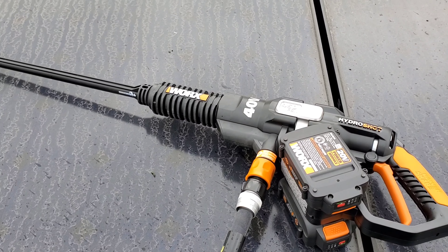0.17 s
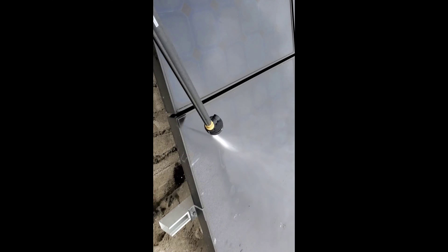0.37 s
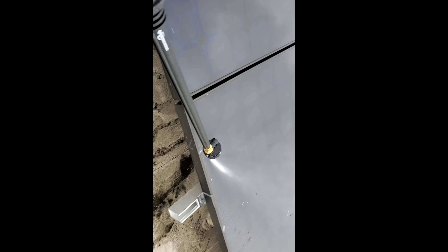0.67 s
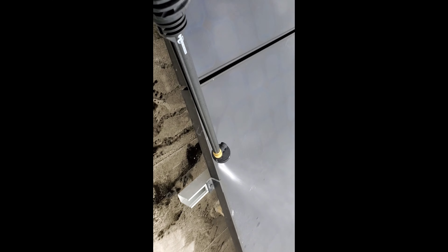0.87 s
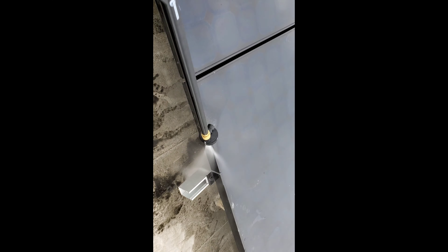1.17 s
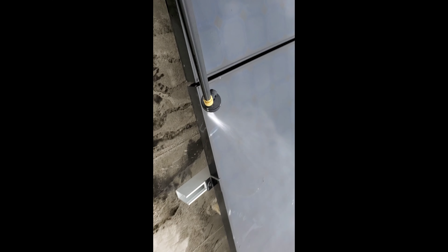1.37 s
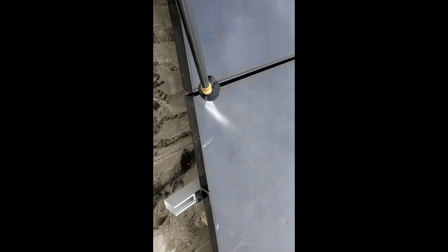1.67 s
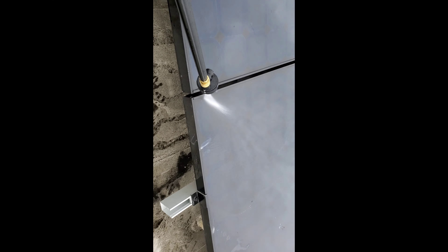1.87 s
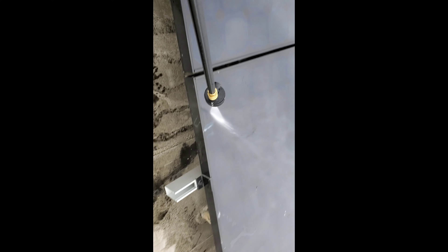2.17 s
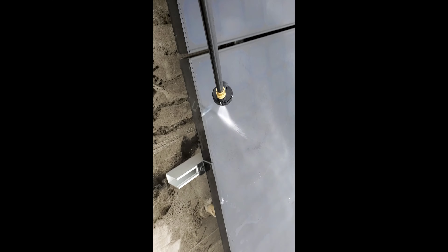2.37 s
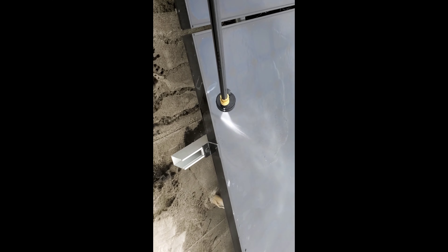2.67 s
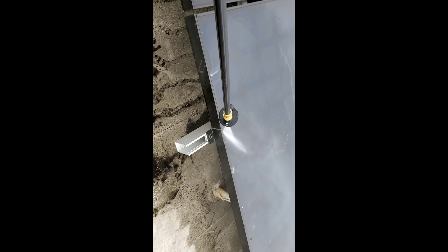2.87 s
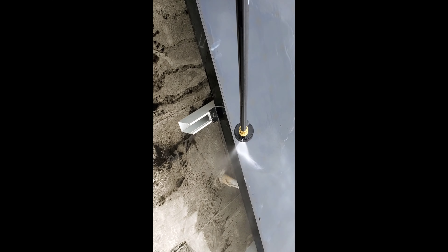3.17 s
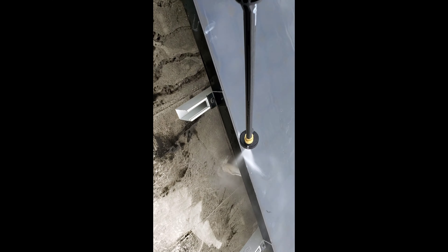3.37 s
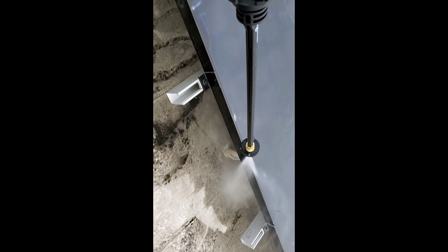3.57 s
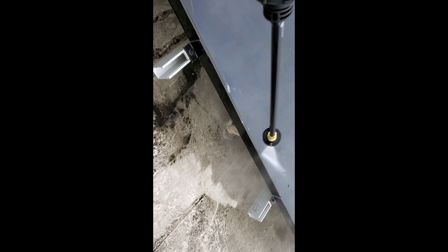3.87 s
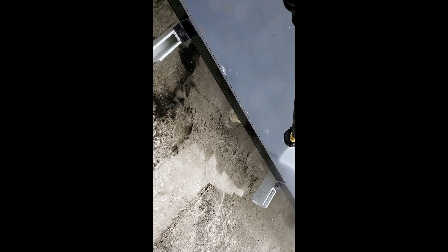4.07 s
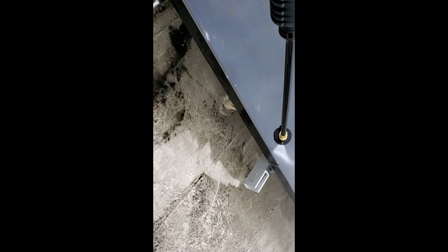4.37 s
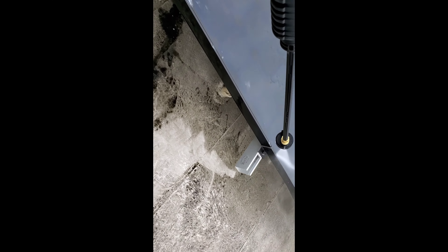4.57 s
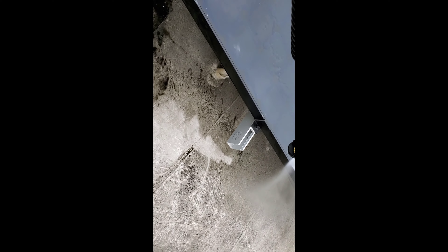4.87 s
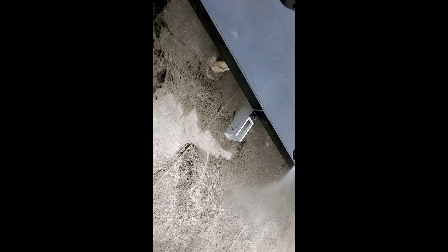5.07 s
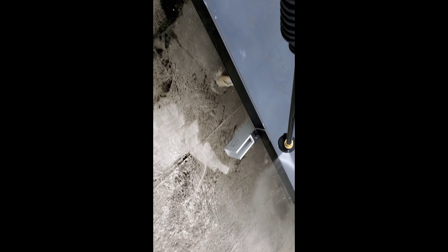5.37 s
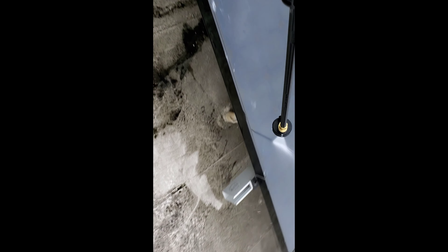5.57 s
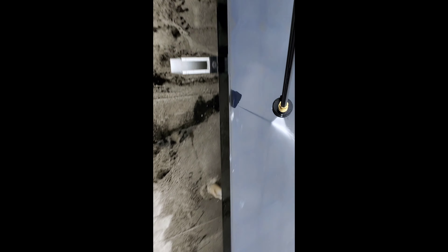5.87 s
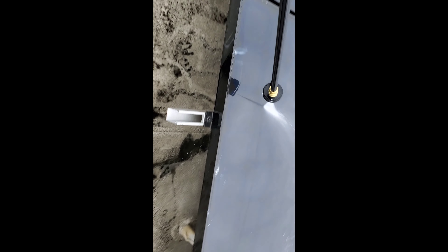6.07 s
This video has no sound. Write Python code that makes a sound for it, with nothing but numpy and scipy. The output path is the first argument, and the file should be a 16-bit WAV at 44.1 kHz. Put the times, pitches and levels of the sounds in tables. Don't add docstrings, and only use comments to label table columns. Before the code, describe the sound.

Quiet yard ambience for under half a second, a tiny gap, then a sudden loud washer very near a phone. Water hisses sharply in a very fast throb and spatters off a glass panel; the pump rattles, the casing buzzes and the motor whines steadily. Irregular low wind thuds hit the microphone, mostly on the left, and two strong blasts briefly push the washer's level down. It is still spraying at the end.

```python
import sys
import numpy as np
from scipy import signal
from scipy.fft import rfft, irfft, next_fast_len
from scipy.io import wavfile
from scipy.ndimage import uniform_filter1d, map_coordinates

SR = 44100
rng = np.random.default_rng(int(sys.argv[2]) if len(sys.argv) > 2 else 0)


def invert_db(level):
    return 10 ** (np.asarray(level, dtype=float) / 20)


def digitize_waveform(pressure):
    field = np.atleast_2d(pressure).T
    bounded = np.clip(field, -1, 1)
    quanta = np.round(bounded * 32767).astype(np.int16)
    wavfile.write(sys.argv[1], SR, quanta)


N = 274743
T = np.arange(N) / SR
BIN_HZ = np.fft.rfftfreq(512, 1 / SR)
PUMP_HZ, WHINE_HZ = 38.868, 3604.3
# t/s, left level/dB, right minus left/dB, lag of the right port/ms
WHINE_PATH = [(.45, -25, 8.5, .46), (.96, -26, 7, .48), (1.0, -35, 5, .49), (1.1, -37, 4, .5),
              (1.25, -35, -2, .515), (1.45, -43, 6, .52), (1.6, -40, 3, .455), (1.75, -38, 2, .44),
              (2.0, -39, 1, .425), (2.15, -42, 3, .455), (2.35, -43, 2, .452), (2.9, -45, 3, .47),
              (3.05, -38, -6, .455), (3.25, -40, 0, .415), (3.4, -36, 0, .415), (3.6, -38, 0, .415),
              (3.8, -36, 0, .415), (3.95, -36, 3, .44), (4.1, -39, 3, .45), (4.4, -39, 4, .48),
              (4.55, -34, 0, .55), (4.75, -36.5, 0, .555), (5.0, -32.5, 0, .555), (5.3, -35, 0, .555),
              (5.45, -35.5, 2, .54), (5.65, -45, 7, .4), (5.78, -43, 9, .34), (5.9, -36, -20, .435),
              (6.07, -38, -20, .52), (6.2, -41, 0, .5)]


def level(x, db):
    return x * invert_db(db) / np.sqrt(np.mean(x ** 2))


def shape(points, hz):
    at, value = np.transpose(points)
    return np.interp(np.log(np.maximum(hz, 1)), np.log(at), value)


def colour(x, points):
    size = next_fast_len(N)
    gain = invert_db(shape(points, np.fft.rfftfreq(size, 1 / SR)))
    return irfft(rfft(x, size) * gain, size)[..., :N]


def to_spectrum(x):
    return signal.stft(x, SR, nperseg=512)[2]


def to_sound(z):
    return signal.istft(z, SR, nperseg=512)[1][..., :N]


def patches(count, patch_hz, patch_s):
    field = rng.standard_normal((len(BIN_HZ), count))
    field = uniform_filter1d(field, 1 + int(patch_hz / BIN_HZ[1]), axis=0)
    field = uniform_filter1d(field, 1 + int(patch_s * SR / 256), axis=1)
    return field / field.std()


def hiss(points, patchy_db, patch_hz, patch_s):
    z = to_spectrum(colour(rng.standard_normal((2, N)), points))
    wander_db = patchy_db * patches(z.shape[2], patch_hz, patch_s)
    return level(to_sound(z * invert_db(wander_db)), 0)


def waver(depth_db):
    knots = np.linspace(0, N / SR, 40)
    return np.interp(T, knots, invert_db(depth_db * rng.standard_normal(len(knots))))


def tones(hz, db, waver_db):
    out = 0
    for f, d in zip(hz, db):
        wave = np.sin(2 * np.pi * (f * T + rng.random()))
        out = out + invert_db(d) * waver(waver_db) * np.sqrt(2) * wave
    return out


def gun():
    # t/s, jet level/dB, casing minus jet/dB, how far the jet's top leans left/dB
    gun_moves = [(.44, -20.5, -5.5, 2), (.6, -20.5, -7.5, 3), (.89, -23.5, -5, 2.5), (.95, -22.5, -11.5, 4),
                 (1.1, -22, -10, 5), (1.299, -23, -10, 3), (1.7, -24.5, -10.5, 3), (1.89, -23, -12, 6),
                 (2.25, -24, -10, 3), (3.2, -23.5, -12.5, 6), (3.8, -20.5, -12.5, 10),
                 (4.0, -21.5, -8, 10.5), (4.551, -21.5, -7.5, 12), (5.1, -19.5, -8, 17),
                 (5.3, -20.5, -6.5, 15), (5.6, -21.5, -7, 11.5), (5.799, -20, -13.5, 9),
                 (5.95, -21.5, -11.5, 10.5), (6.23, -21.5, -11.5, 6)]
    # f/Hz, level per Hz/dB
    jet_spectrum = [(9000, -31.5), (10500, -12), (11500, -6.5), (12300, 1), (13300, 0.5), (14000, -0.5),
                    (15600, -2)]
    splash_spectrum = [(3000, -12.5), (5000, -9.5), (5900, -8), (6600, -1.5), (7500, -2), (8250, -1.5),
                       (8700, -1.5), (9200, -4), (9750, -8), (10400, -6), (12000, -16.5)]
    casing_spectrum = [(200, -20.5), (400, -7.5), (850, -3.5), (1300, 0.5), (1600, -2), (2200, 4),
                       (2500, -0.5), (3100, 1), (3420, -0.5), (3750, -7.5), (3950, -5.5), (4400, -1),
                       (4800, -4.5), (5500, -2.5), (7000, -45.5)]
    # f/Hz, level/dB
    turned_away = [(2300, -40), (2600, 0), (3450, 0), (3900, -40)]
    sung_orders = [27, 30, 34, 42, 46, 48, 52, 54, 55, 56, 57, 58, 70, 72, 73, 74, 113, 114, 116, 174, 229,
                   230, 282, 284, 286, 340, 342]
    sung_db = [-17, -20, -19, -16, -18, -18, -15, -12, -15, -11, -15, -5.5, -20, -19, -19, -20, -13, -14,
               -17, -17, -8, -14, -14, -13, -13, -8, -6]
    # multiple of the pump turn, level over the jet/dB
    hum_lines = [(9, -27), (10, -29), (14, -28), (16, -27), (17, -20), (19, -19.5), (20, -27)]
    # ratio to the whine, level over the jet/dB
    motor_lines = [(1.2958, -25), (1.4, -22)]

    s, *columns = np.transpose(gun_moves)
    jet_db, casing_db, lean_db = (np.interp(T, s, c) for c in columns)

    jet = hiss(jet_spectrum, patchy_db=2.5, patch_hz=597, patch_s=.25)
    jet = invert_db(10.5) * jet * throb(2.26, 0.144, 0.47)

    splash_db = -2 - 0.3235 * lean_db
    splash = hiss(splash_spectrum, patchy_db=-0.6, patch_hz=400, patch_s=0.29)
    splash = invert_db(splash_db + 4.5) * splash * throb(0.41, 0.315, 0.156)

    casing = hiss(casing_spectrum, patchy_db=2.18, patch_hz=300, patch_s=0.14)
    casing = invert_db(casing_db + 3.0) * casing * throb(0.8, 0.738, 1.11)
    fade = invert_db(-.8 * np.maximum(lean_db - 7.5, 0))
    casing = casing + (fade - 1) * colour(casing, turned_away)

    gears = invert_db(casing_db) * tones(PUMP_HZ * np.array(sung_orders), sung_db, waver_db=2)
    order, hum_db = np.transpose(hum_lines)
    hum = tones(PUMP_HZ * order, hum_db, waver_db=1.5)
    ratio, motor_db = np.transpose(motor_lines)
    motor = tones(ratio * WHINE_HZ, motor_db, waver_db=3)
    tonal = gears + hum + motor + invert_db(-18.5) * knocks(waver_db=4.0)
    return invert_db(jet_db) * (jet + splash + casing), invert_db(jet_db) * tonal, lean_db


def throb(depth_db, peak, double_db):
    turn = 2 * np.pi * (PUMP_HZ * T - peak)
    return invert_db(depth_db * np.cos(turn) + double_db * np.cos(2 * turn))


def knocks(waver_db):
    knock_places = [(0.15, 5.5), (.45, 8.5), (.55, -4), (0.805, -17.5)]
    # f/Hz, width/Hz (wider dies sooner), level/dB
    casing_rings = [(1170, 380, -6), (1657, 127, -4), (2200, 340, -19.5), (4330, 395, -2.5),
                    (6980, 272, -1), (8075, 150, 4), (8800, 200, 0), (11090, 250, 4), (13300, 300, 10),
                    (12050, 2500, -7.5)]
    turn = np.linspace(0, 1, 16384)
    part, size_db = np.transpose(knock_places)
    since = (turn - part[:, None]) % 1 / PUMP_HZ
    out = 0
    for hz, width, db in casing_rings:
        ring = np.exp(-np.pi * width * since) * np.sin(2 * np.pi * hz * since)
        one_turn = level(invert_db(size_db) @ ring, db)
        out = out + waver(waver_db) * np.interp(PUMP_HZ * T % 1, turn, one_turn)
    return out


def whine():
    s, left_db, tilt_db, lag_ms = np.transpose(WHINE_PATH)
    heard_at = np.array([T, T - np.interp(T, s, lag_ms) / 1000])
    db = np.array([np.interp(T, s, left_db), np.interp(T, s, left_db + tilt_db)])
    main = invert_db(db + 2.5) * waver(.6) * np.sin(2 * np.pi * WHINE_HZ * heard_at)

    heard_at = np.array([T, T - .535 / 1000])
    octave = np.array([waver(3), waver(3)]) * np.sin(4 * np.pi * WHINE_HZ * heard_at)
    return np.sqrt(2) * (main + invert_db(-41.5) * octave)


def ports(noise, tonal, lean_db):
    # t/s, edge of the wind guard f/Hz, lag of the right port/ms, phase lead from the panel's echo/rad
    guard_moves = [(.43, 980, 0.442, 1.3), (.8, 1150, 0.462, 1.45), (.95, 2540, 0.478, 1.21),
                   (1.1, 4200, 0.483, 1.39), (1.601, 5260, 0.442, 0.58), (1.85, 4366, 0.45, 1.34),
                   (2.699, 4200, 0.4666, 0.95), (2.9, 5150, 0.503, 1.3), (3.1, 3520, 0.517, 1.04),
                   (3.5, 4602, 0.527, 0.61), (3.8, 4616, 0.5305, 0.57), (4.05, 3880, 0.5335, 0.61),
                   (4.3, 4950, 0.539, 0.65), (4.552, 3940, 0.538, 0.35), (5.0, 4634, 0.4986, -0.3),
                   (5.4, 4487, 0.5055, -0.56), (5.55, 4050, 0.514, -0.2), (5.68, 3300, 0.539, 0.55),
                   (5.8, 2380, 0.544, 0.21), (5.92, 2050, 0.531, 0.84), (6.02, 1160, 0.514, -0.98),
                   (6.23, 1093, 0.558, -1)]
    # f/Hz, share heard alike by both ports (0 to 1)
    shared_part = [(300, 1), (1400, 1), (2500, 0.4), (5000, 0.3), (5600, 0.4), (6600, 0.2), (8500, 0.3),
                   (9400, .85), (10200, .85), (11200, .25), (15000, 0.14)]
    # f/Hz, level/dB
    right_colour = [(900, 6.5), (1300, 3), (1650, 10), (2100, 6), (3000, 4.5), (4400, 10.5), (5000, 6.5),
                    (6000, -3), (8000, -2), (10000, 1.5), (11500, -5), (13300, -15.5), (14300, -16.5),
                    (15500, -17)]
    # f/Hz, level/dB
    guard_leak = [(1500, -14), (2200, -4), (2600, -3), (2900, -6), (3150, -1.5), (3600, -4), (4200, -4)]
    # t/s, lag/ms
    dip_path = [(.45, .466), (.9, .466), (1.0, .415), (1.45, .415), (1.6, .478), (2.5, .478), (2.62, .415),
                (3.3, .415), (3.45, .445), (3.8, .461), (5.65, .461), (5.8, .43), (6.2, .44)]
    # t/s, lag/ms
    splash_path = [(.45, .55), (1.0, .53), (1.5, .54), (1.9, .5), (2.3, .51), (2.65, .56), (6.2, .565)]

    s, edge_hz, lag_ms, lead = np.transpose(guard_moves)
    late = np.arange(N) - np.interp(T, s, lag_ms) * SR / 1000
    hiss_late = to_spectrum(map_coordinates(noise[0], [late], order=3))
    tonal_late = to_spectrum(map_coordinates(tonal, [late], order=3))
    other_hiss = to_spectrum(noise[1])
    at = np.arange(hiss_late.shape[1]) * 256 / SR
    hz = BIN_HZ[:, None]

    share = np.clip(shape(shared_part, hz), 0, 1)
    own = np.sqrt(share) * hiss_late + np.sqrt(1 - share) * other_hiss + tonal_late
    shade = [(4500, 0), (5400, 0.627), (6300, 1.59), (6700, 0.76), (9000, 0.0), (13000, 0.665)]
    shade_db = (np.interp(at, T, lean_db) - 7.5) * shape(shade, hz)
    own = own * invert_db(shape(right_colour, hz) - shade_db)

    leak = invert_db(shape(guard_leak, hz))
    copy = (hiss_late + leak * other_hiss) / np.sqrt(1 + leak ** 2) + tonal_late
    above = np.clip((hz - np.interp(at, s, edge_hz)) / 150 + .5, 0, 1)

    turn = shape([(200, 0.0), (550, 0.73), (1300, 0.321), (2000, 0.167)], hz)
    turn = turn + np.interp(at, s, lead) * np.exp(-((hz - 1500) / 350) ** 2)
    whine_path = np.transpose(WHINE_PATH)[[0, 3]]
    for path, centre_hz, width_hz, power in [(whine_path, 3650, 190, 2),
                                             (np.transpose(dip_path), 9800, 900, 4),
                                             (np.transpose(splash_path), 5900, 1800, 4)]:
        sooner_ms = np.interp(at, s, lag_ms) - np.interp(at, *path)
        band = np.exp(-((hz - centre_hz) / width_hz) ** power)
        turn = turn + 2 * np.pi * hz * sooner_ms / 1000 * band
    wander = [(1000, .1), (3500, .25), (6000, .5), (7000, .9), (8600, 2), (9300, .45), (10300, .45), (11200, 2)]
    turn = turn + shape(wander, hz) * patches(len(at), patch_hz=350, patch_s=.25)
    right = (above * own + (1 - above) * copy) * np.exp(1j * turn)
    return np.array([noise[0] + tonal, to_sound(right)])


def wind():
    # t/s, peak level/dB, time to fall 10 dB/s, left minus right/dB
    gust_times = [(.68, -35, 0.31, 9), (.88, -33, 0.06, 4), (0.969, -29.5, 0.2, 1.5),
                  (1.24, -23.5, 0.06, -0.5), (1.41, -23.5, 0.07, 2.5), (1.53, -24, 0.16, 0),
                  (1.73, -22.5, 0.074, 3.5), (2.06, -24.5, 0.0743, -1), (2.18, -30.5, 0.13, 4),
                  (2.32, -28, 0.0041, 11.5), (2.69, -40, 0.58, 5.5), (2.87, -37.5, 0.4, 1.5),
                  (3.15, -30.5, 1.15, 1.5), (3.43, -31, 0.39, 1), (3.781, -30, 0.12, -0.5),
                  (4.1, -26, 0.28, 1.5), (4.35, -27, 0.32, 3.5), (4.607, -22, 0.06, 5.5),
                  (4.83, -26.5, 0.15, 4), (5.03, -30, 0.04, 5.5), (5.22, -28.5, 0.03, 9.5),
                  (5.31, -27.5, 0.0477, 7), (5.45, -28.5, 0.06, 10.5), (5.65, -35, 0.5, 5),
                  (6.15, -29, 0.16, 1.5)]
    # f/Hz, level per Hz/dB
    gust_spectrum = [(20, -12.5), (40, 1), (80, 1.5), (200, -6), (450, -11), (900, -19.5), (2000, -25)]
    s, db, fall_s, pan_db = np.transpose(gust_times)
    swell = invert_db(-20 * abs(T - s[:, None]) / fall_s[:, None])
    breeze = invert_db(2 * -38.5)
    power = np.array([invert_db(2 * db + side * pan_db) @ swell + breeze for side in (1, -1)])
    gust_db = 10 * np.log10(power)
    low = hiss(gust_spectrum, patchy_db=3, patch_hz=150, patch_s=.04)
    rush = level(colour(low, [(150, -33.5), (400, 4.5), (900, -3.5)]), 0)
    return invert_db(gust_db + 2) * low + invert_db(3.65 * (gust_db + 28.0) - 57.0) * rush


def pops():
    # t/s, peak level/dB, port (0 left, 1 right), push +1 or pull -1
    slaps = [(0.571, -17.7, 0, 1), (0.879, -17.1, 0, 1), (1.251, -16.4, 0, 1), (1.251, -15.2, 1, -1),
             (1.39, -13.7, 0, 1), (1.394, -16.4, 0, 1), (1.406, -17.6, 0, -1), (1.406, -12.6, 1, -1),
             (1.412, -13.9, 1, 1), (1.43, -15.2, 0, 1), (1.443, -17.4, 0, -1), (1.499, -16.0, 0, 1),
             (1.512, -17.2, 0, -1), (1.516, -17.1, 1, 1), (1.519, -16.0, 0, 1), (1.52, -17.1, 1, -1),
             (1.524, -17.3, 1, -1), (1.534, -15.7, 1, -1), (1.683, -17.2, 0, -1), (1.72, -14.9, 0, 1),
             (2.036, -17.4, 0, -1), (2.045, -17.5, 1, -1), (2.307, -11.1, 0, 1), (2.638, -17.8, 0, -1),
             (2.713, -16.7, 0, 1), (4.096, -17.6, 0, -1), (4.135, -16.9, 0, 1), (4.154, -17.5, 1, 1),
             (4.364, -15.9, 0, 1), (4.516, -14.5, 0, 1), (4.521, -14.9, 0, 1), (4.563, -15.8, 0, 1),
             (4.58, -15.9, 0, -1), (4.599, -11.8, 0, 1), (4.609, -10.5, 0, 1), (4.806, -12.3, 0, 1),
             (4.811, -15.9, 0, 1), (5.023, -17.6, 0, -1), (5.213, -13.5, 0, 1), (5.308, -11.8, 0, 1),
             (5.417, -17.7, 0, 1), (5.441, -17.0, 0, 1), (5.473, -15.6, 0, 1), (6.23, -17.3, 1, 1)]
    wide_s = .0008 * np.exp(.25 * rng.standard_normal(len(slaps)))
    since = np.arange(-400, 400) / SR
    out = np.zeros((2, N + len(since)))
    for (s, db, port, sign), wide in zip(slaps, wide_s):
        rebound = .3 * np.exp(-(since / (3.3 * wide)) ** 2)
        push = np.exp(-(since / wide) ** 2) - rebound
        start = int(s * SR)
        out[round(port), start:start + len(since)] += np.sign(sign) * invert_db(db + 1.22) * push
    return out[:, 400:N + 400]


def yard():
    # f/Hz, level per Hz/dB
    yard_spectrum = [(25, -38), (40, -9.5), (70, -6.5), (105, -4.5), (120, 10), (140, -7.5), (220, -8),
                     (320, -18.5), (355, -9.5), (450, -21.5), (700, -27), (1500, -29), (2500, -34),
                     (15500, -49.5)]
    # f/Hz, level/dB
    port_colours = [
        [(2000, 1.5), (4000, -9), (9500, -4), (13000, 3), (15000, 3)],
        [(2000, 2), (4000, 1.5), (9500, -6.5), (13000, -8), (15000, -9)],
    ]
    mid, side = hiss(yard_spectrum, patchy_db=2.0, patch_hz=100, patch_s=.05)
    side = colour(side, [(60, -18.0), (150, -20.0), (300, -14.0), (700, -1.5), (1400, 0.5)])
    left = colour(mid + side, port_colours[0])
    right = colour(mid - side, port_colours[1])
    return invert_db(-29.5) * np.array([left, right])


def gain_control():
    # t/s, depth/dB
    ducks = [
        (2.31, -4.5),
        (4.614, -5),
    ]
    attack_s, release_s = 0.01, 0.446
    s, depth_db = np.transpose(ducks)
    since = np.maximum(T - s[:, None], 0)
    dip = (1 - np.exp(-since / attack_s)) * np.exp(-since / release_s)
    return invert_db(depth_db @ dip)


def scene():
    cut_s, start_s = .4195, .4325
    before = np.clip((cut_s - T) / 0.00087, 0, 1)
    after = np.clip((T - start_s) / 0.0011, 0, 1)
    settle = invert_db(-8.0 + 8.66 * np.exp(-((T - start_s) / 0.373) ** 2))
    steady = yard() * (before + settle * after) + after * (ports(*gun()) + whine())
    return steady * gain_control() + after * (wind() + pops())


def band_limit(x):
    return signal.sosfilt(signal.butter(12, 16580, fs=SR, output="sos"), x)


def record(dry):
    rounded = np.tanh(.8 * dry) / .8
    top_cut = signal.ellip(12, .2, 70, 15450, fs=SR, output="sos")
    return band_limit(signal.sosfilt(top_cut, rounded))


dry = scene()
out = record(dry)
digitize_waveform(out)
```